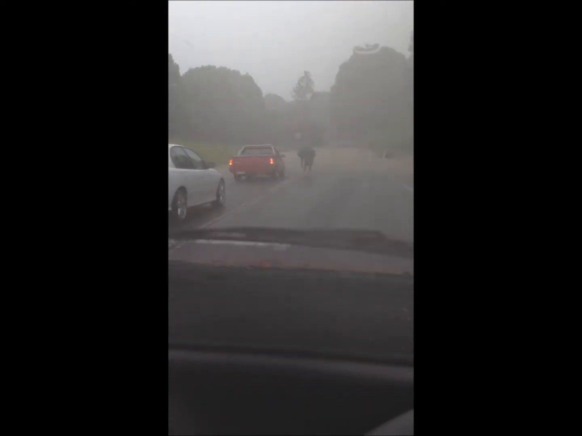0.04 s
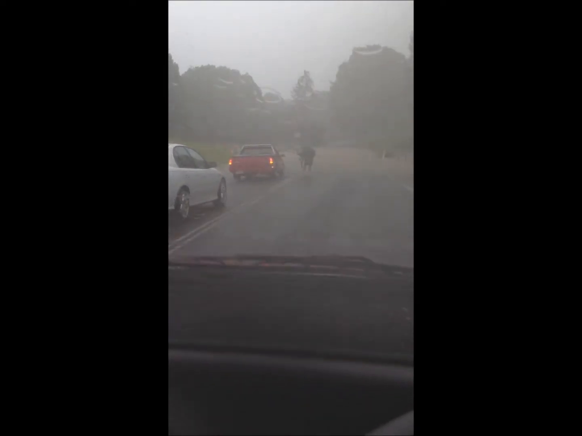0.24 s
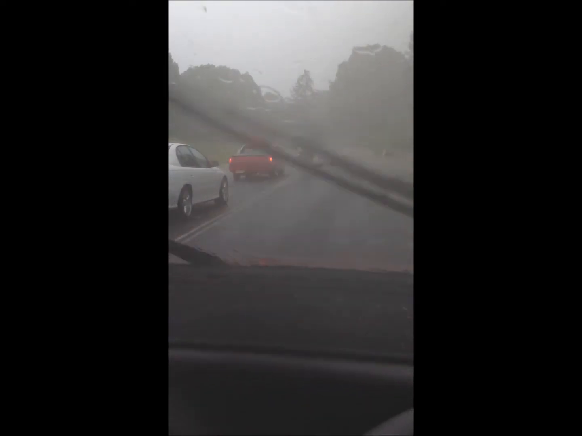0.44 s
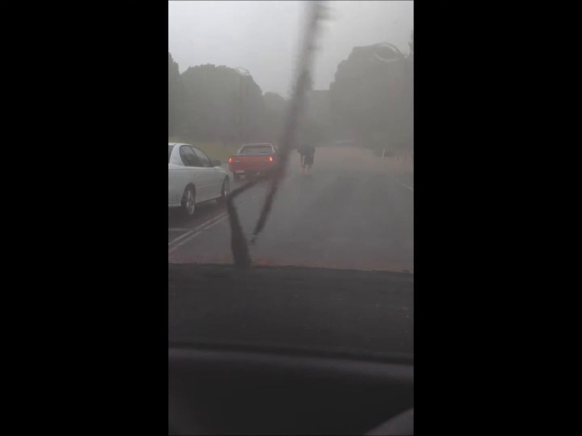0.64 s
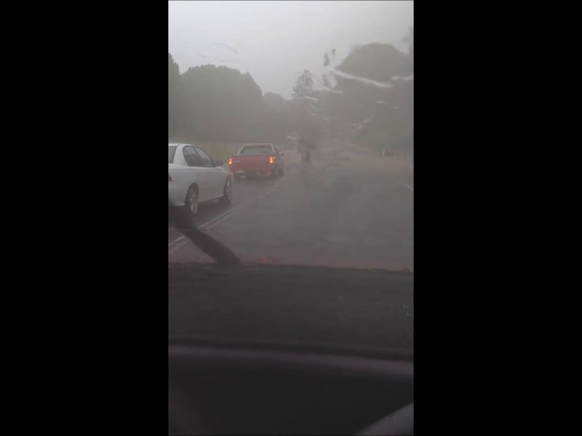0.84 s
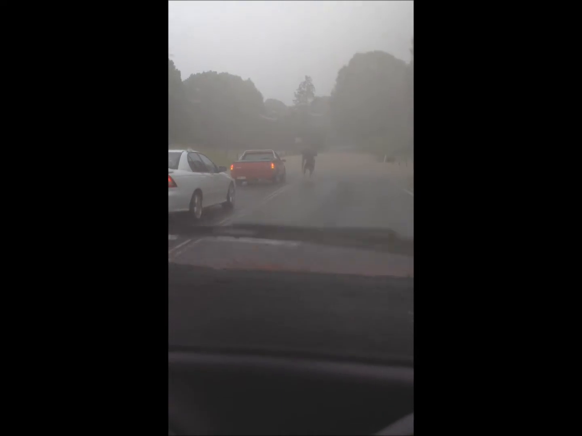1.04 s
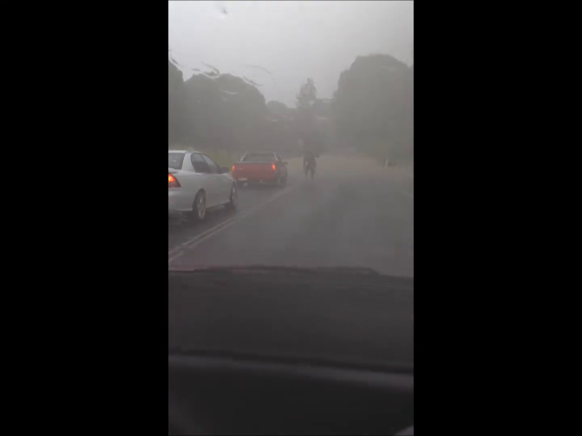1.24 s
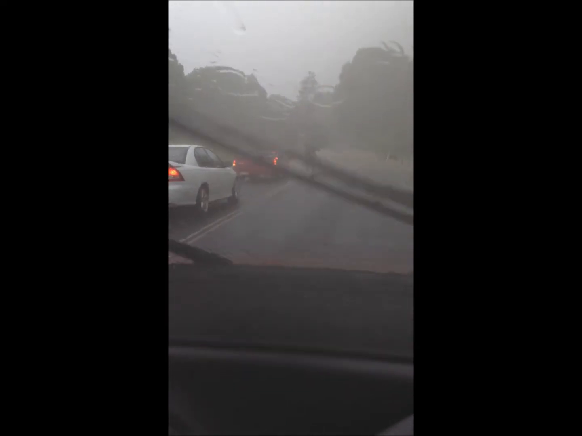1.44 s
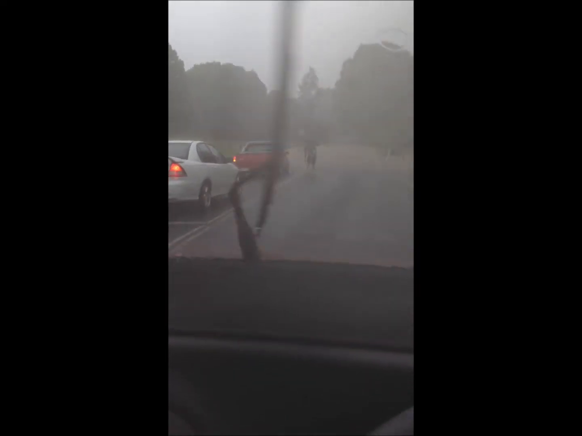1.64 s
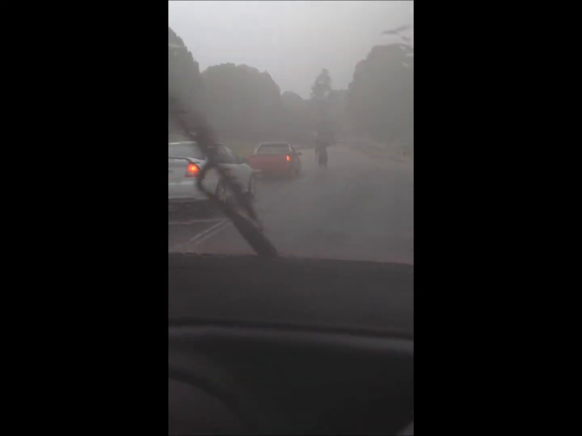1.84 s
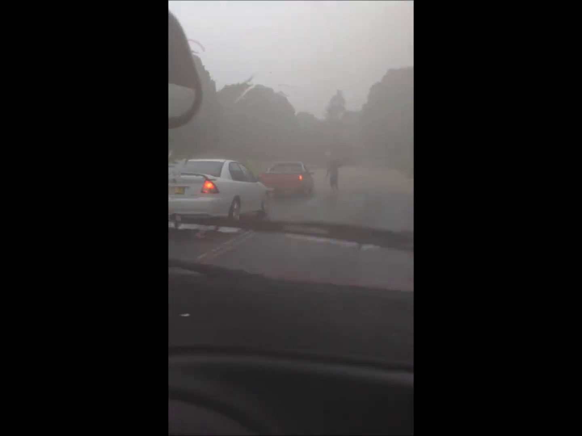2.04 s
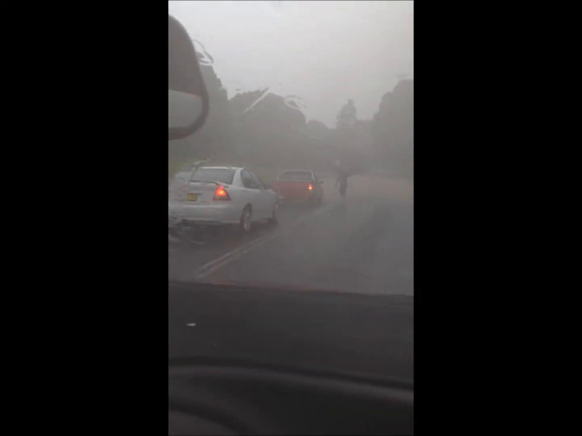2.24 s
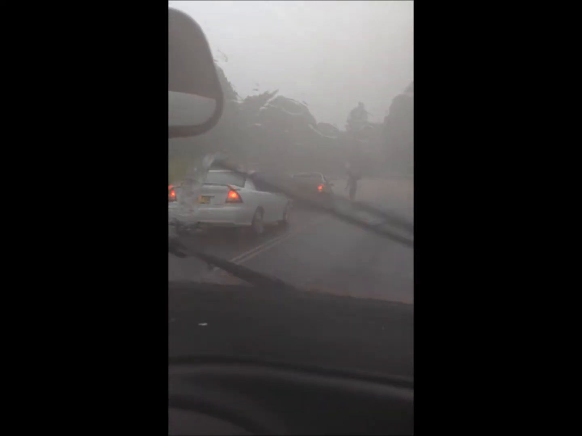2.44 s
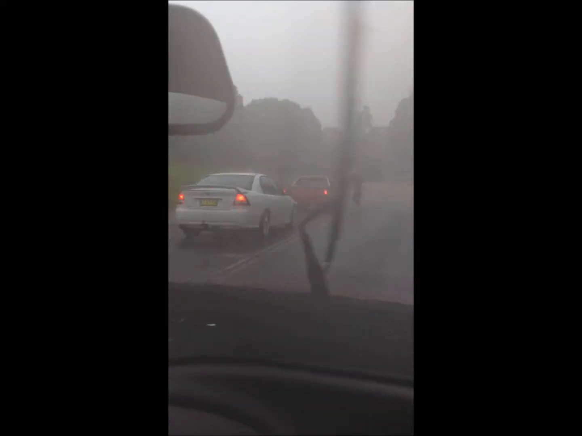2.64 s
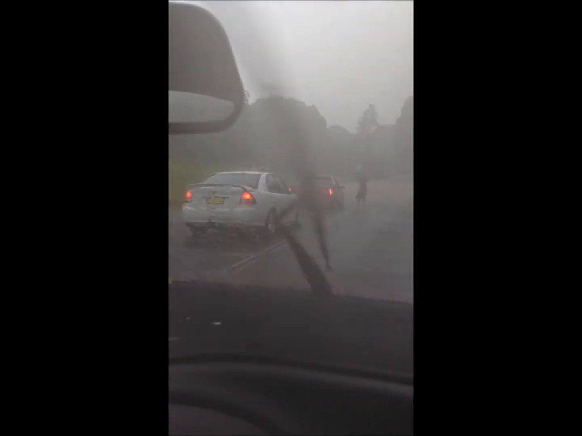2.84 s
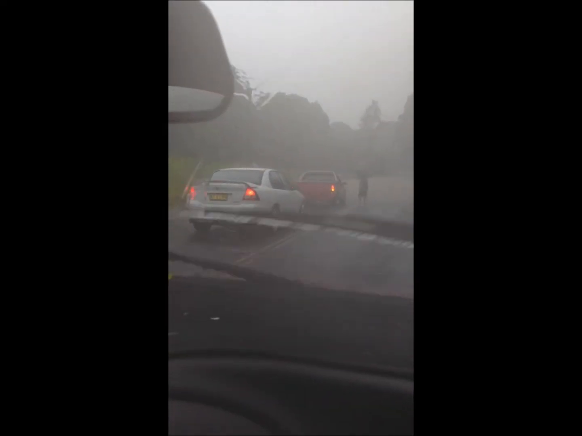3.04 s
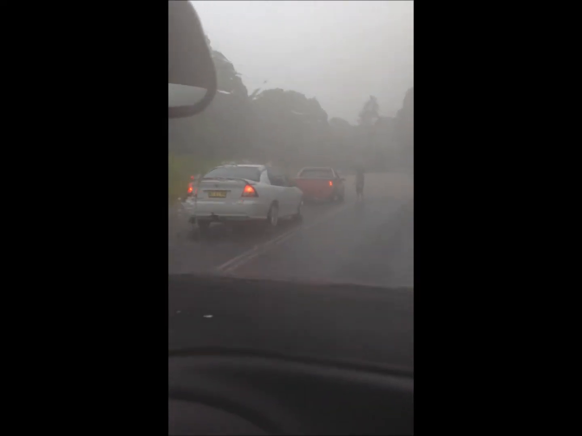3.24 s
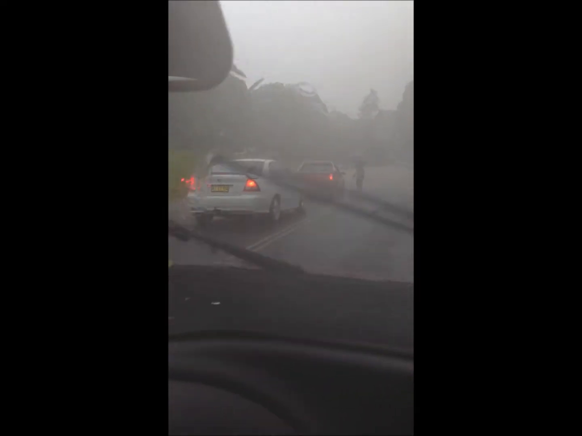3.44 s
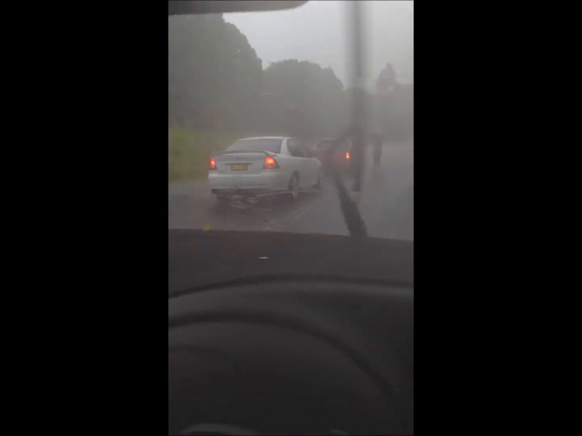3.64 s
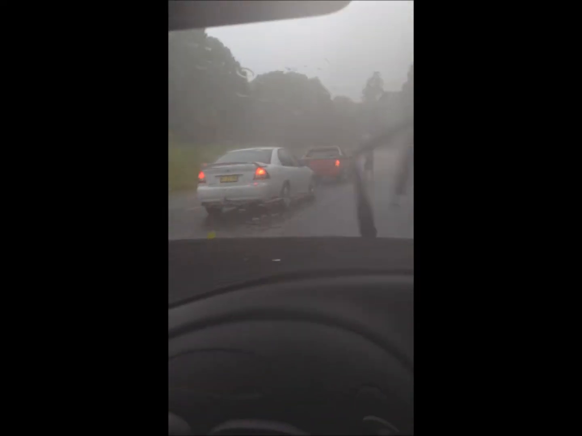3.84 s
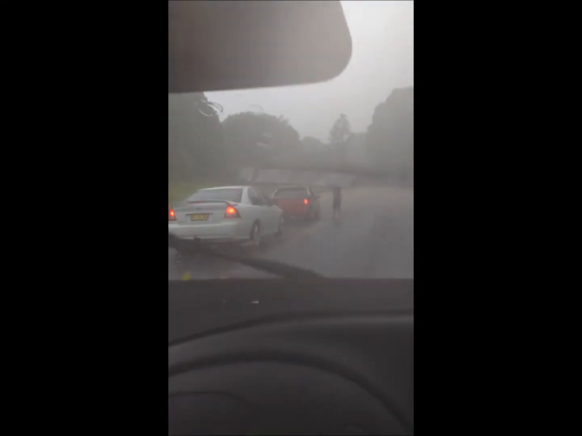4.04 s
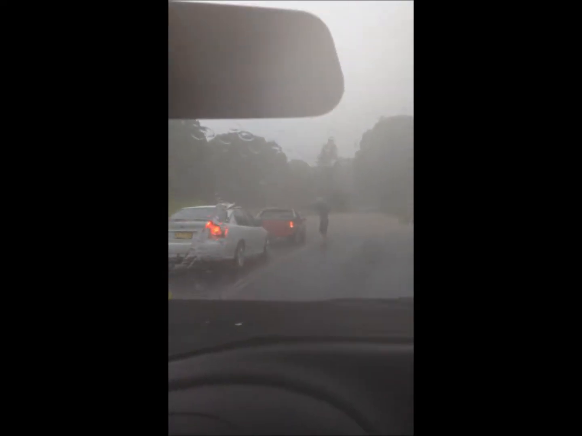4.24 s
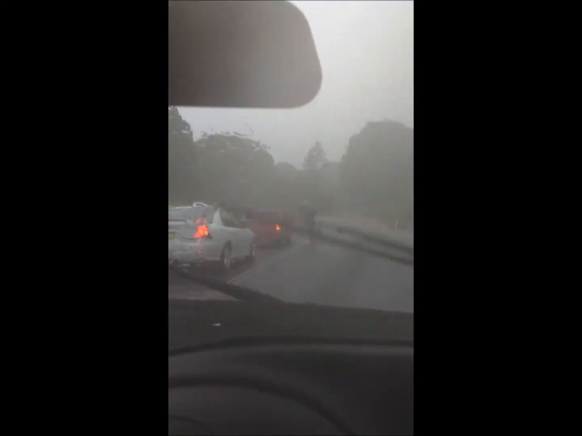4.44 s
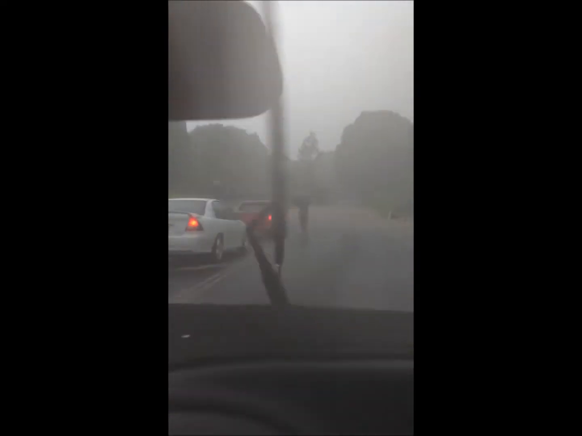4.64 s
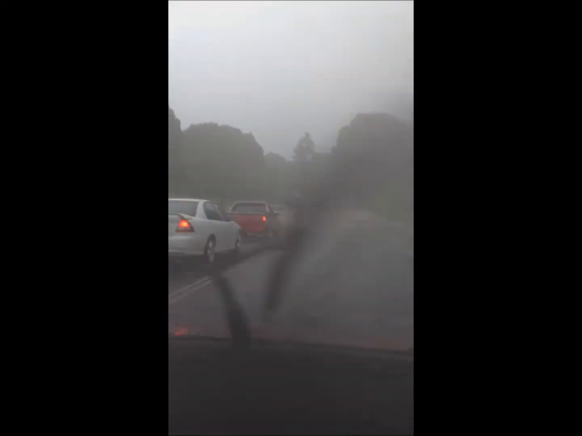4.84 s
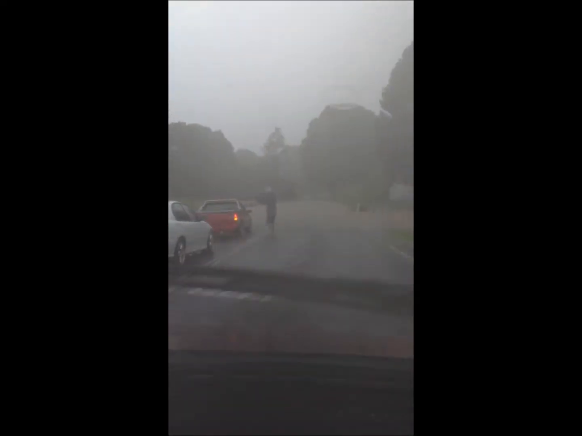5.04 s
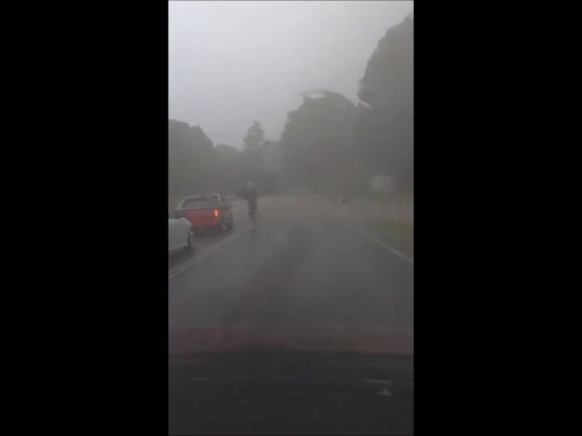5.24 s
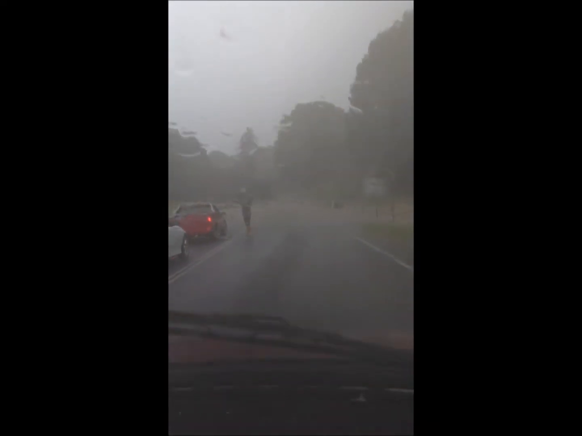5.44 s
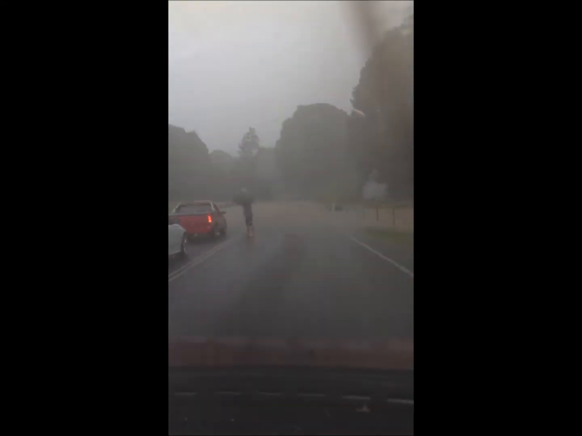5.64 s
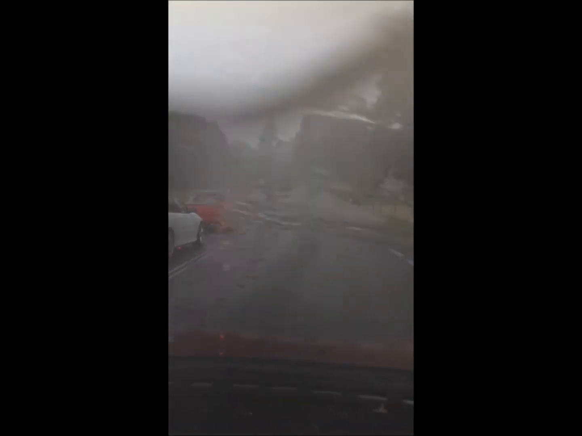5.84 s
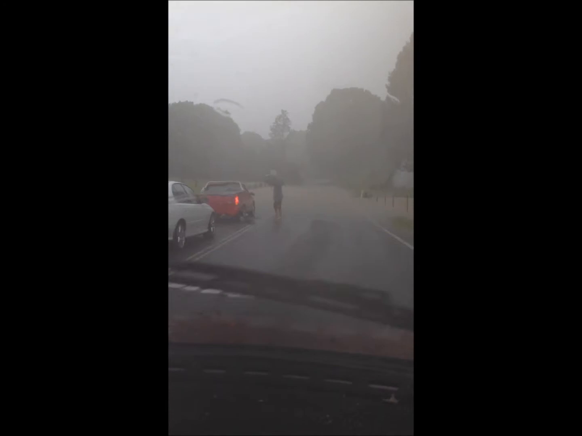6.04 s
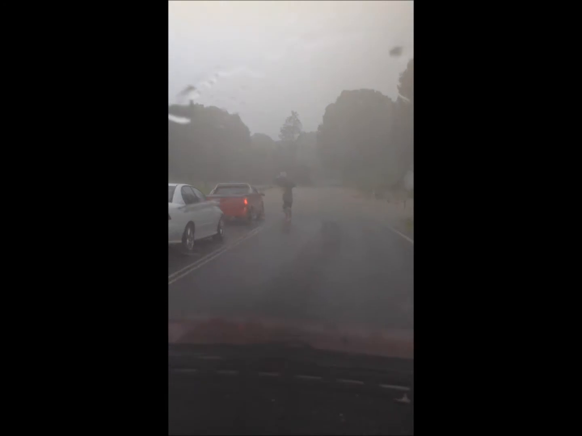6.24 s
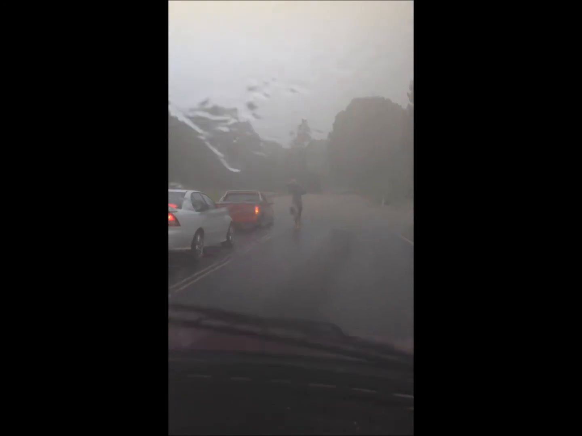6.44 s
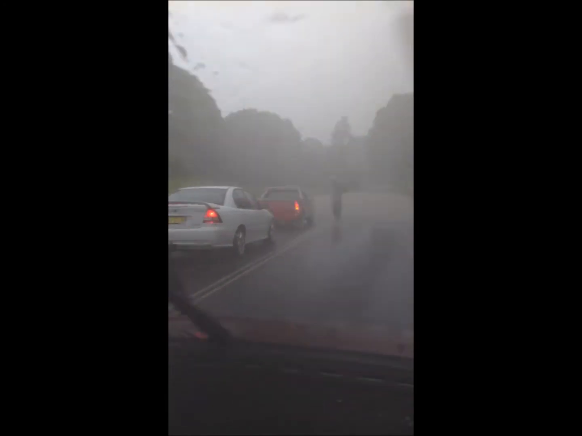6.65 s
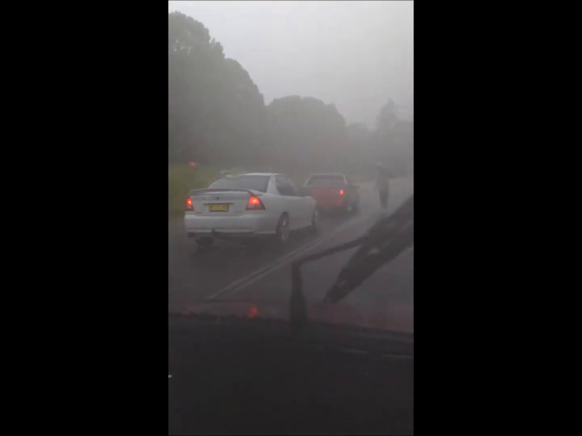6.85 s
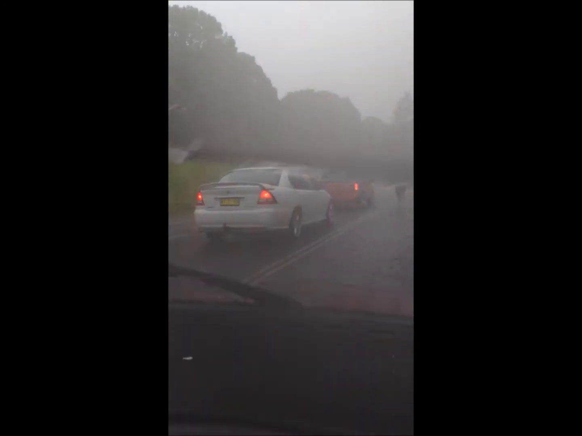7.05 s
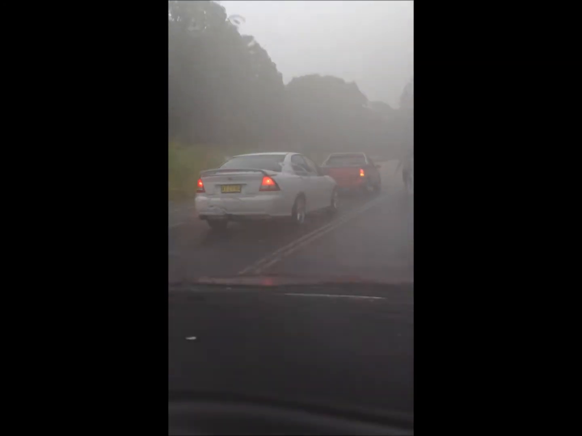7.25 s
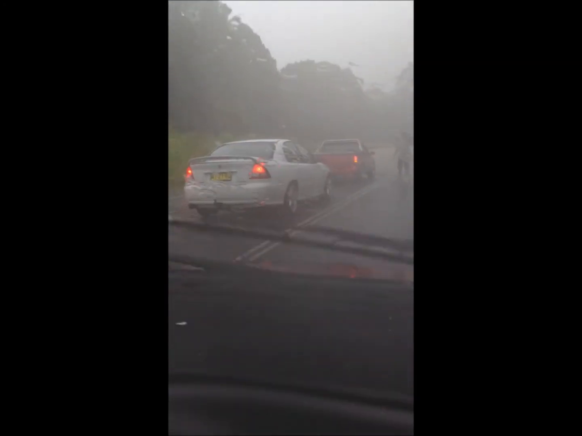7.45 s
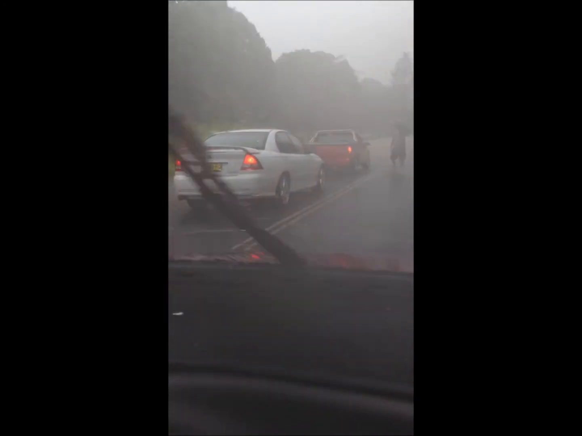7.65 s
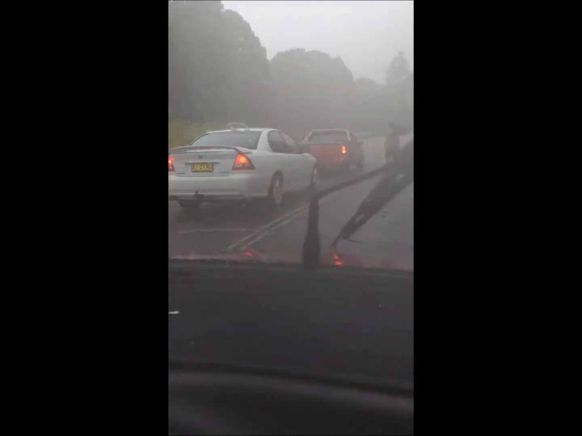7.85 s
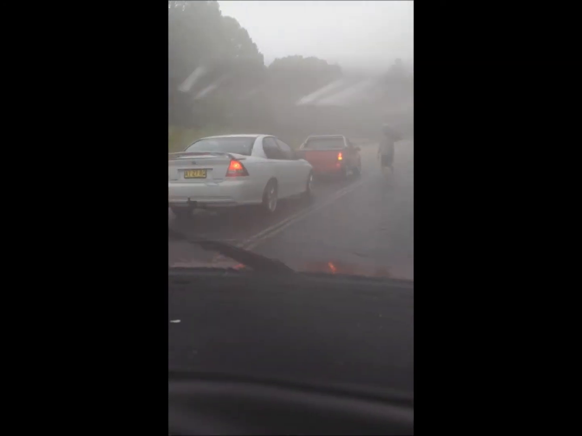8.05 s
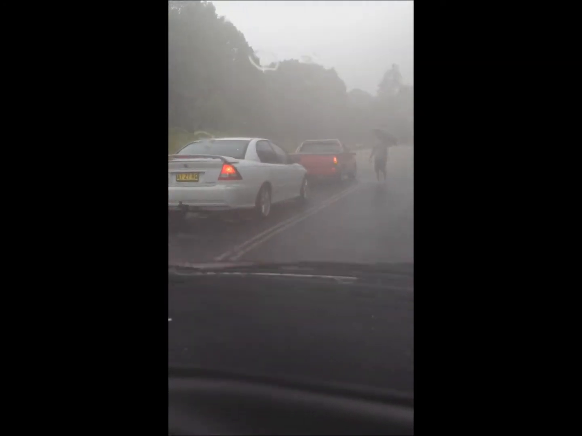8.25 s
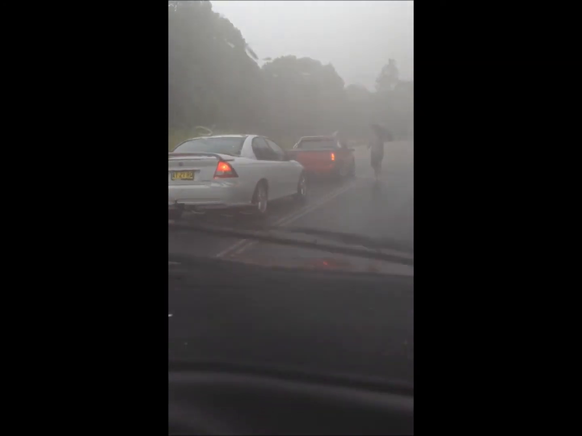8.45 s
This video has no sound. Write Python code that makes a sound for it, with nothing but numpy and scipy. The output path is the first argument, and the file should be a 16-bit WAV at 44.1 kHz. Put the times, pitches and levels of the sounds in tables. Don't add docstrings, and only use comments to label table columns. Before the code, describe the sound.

Heard from inside a standing car, heavy rain is already drumming from 0 s: a dense, dull low roar on roof and bonnet, with fainter patter on the windscreen. The engine's soft, low idle boom lies beneath. Wipers cross the glass about once a second; blades flop over with a muffled thump roughly every half second from 0.3 s, uneven in strength. Near 0.35, 1.4, 2.4, 3.4 s and onward, a small dry click follows a thump, then a weaker one, with faint ticks between. Fat drops ring hollow on roof panels, clustering around 2.1-2.5 s, when rain swells. It eases about 3.4-4.5 s, strengthens near 5 s, and stays heavy with strong drops at 5.9, 6.4 and 6.9 s and many from 7.4 to 8.3 s. Rain and wipers continue to the cut at 8.5 s. Phone microphone, small padded cabin, light hiss and a barely perceptible high whine.

```python
import sys
import numpy as np
from scipy import signal
from scipy.fft import rfft, irfft
from scipy.io import wavfile
from scipy.ndimage import uniform_filter1d

SR = 44100
rng = np.random.default_rng(int(sys.argv[2]) if len(sys.argv) > 2 else 0)


def dump_mix(stems):
    frames = np.atleast_2d(stems).T
    limited = np.clip(frames, -1, 1)
    pcm = np.round(limited * 32767).astype(np.int16)
    wavfile.write(sys.argv[1], SR, pcm)


def ratio(d):
    e = np.asarray(d, float) / 20
    return 10 ** e


N = 375291
TIME = np.arange(N) / SR

# [t/s, strength/dB, extra blown against the glass/dB]
RAIN = [(0, -32, -2.5), (.6, -32, -1.5), (1.1, -32.5, 2.5), (1.5, -31.5, -1), (1.85, -32.5, 2),
        (2.25, -27.5, 1.5), (2.9, -30, 2.5), (3.4, -34.5, 3), (3.75, -34, 2), (4.4, -35, -0.5),
        (4.85, -31.5, 0), (5.3, -30.5, -2.5), (5.9, -33, -3), (6.5, -32, 1), (6.9, -32, -2.5),
        (7.5, -30.5, 1), (8.15, -33.5, 0.5), (8.51, -30, -3.5)]
# [t/s, peak level/dB, f/Hz]
BIG_DROPS = [(0.151, -14.5, 538), (0.266, -20, 350), (0.316, -15.5, 462), (1.174, -17, 568),
             (1.796, -18.5, 520), (2.089, -14.5, 635), (2.233, -10.5, 561), (2.387, -16, 516),
             (2.416, -15.5, 528), (2.452, -12.5, 530), (2.509, -15, 532), (2.901, -14.5, 557),
             (3.299, -14.5, 553), (4.13, -16.5, 560), (4.846, -18, 614), (4.99, -17, 605),
             (5.353, -13.5, 558), (5.868, -11.5, 508), (6.056, -14, 479), (6.377, -10.5, 526),
             (6.878, -10, 585), (7.066, -16, 470), (7.372, -14.5, 449), (7.5, -14, 350), (7.79, -14, 547),
             (7.892, -15.5, 507), (8.079, -16, 526), (8.16, -18, 544), (8.265, -14.5, 610),
             (8.32, -18, 516)]
# [t/s, thump level/dB, scrape level/dB]
BLADE_TURNS = [(0.276, -25, -62), (0.790, -39, -56), (1.295, -35, -71), (1.803, -24.5, -63),
               (2.309, -36, -60.5), (2.807, -30.5, -56), (3.334, -25.5, -61), (3.843, -24, -65),
               (4.351, -27, -67), (4.868, -25, -60.5), (5.361, -33, -55), (5.869, -22.5, -56),
               (6.384, -27, -63), (6.885, -29, -53), (7.375, -33, -62), (7.905, -22.5, -60),
               (8.399, -28.5, -65)]
# [t/s, loud click/dB, second click/dB, tick on the way back/dB, tick before parking/dB]
SWEEPS = [(0.3507, -45, -51.5, -60, -61), (1.3658, -45.5, -50.5, -60, -60), (2.3828, -46, -53, -58, -58),
          (3.3984, -43.5, -51.5, -59, -59), (4.419, -47.5, -50, -56, -58), (5.4374, -45.5, -51.5, -56, -58),
          (6.454, -45.5, -49.5, -60, -53.5), (7.4689, -45, -50.5, -60, -54), (8.486, -44.5, -50, -54, -65)]
# [t after the loud click/s, rattle level/dB, knock in the arm/dB]
KNOCKS = [
    (0, -7, 2.5),
    (.1195, -4.5, 8),
    (-.4, -5, 1),
    (-.2105, -4, 6),
]
# [t after the loud click/s, peak level/dB, rattle/dB, knock in the arm/dB]
UPWARD_TICK = (-0.8, -64, -2, 9)
# [f/Hz, level per Hz/dB]
ROOF = [(40, -53), (110, -12.5), (160, -5.5), (190, -2.5), (212, -2), (230, -4), (262, 0.5), (306, -4.5),
        (350, 1), (390, -9.5), (450, -13), (600, -25), (1200, -54.5), (20000, -110)]
BONNET = [(40, -67.5), (250, -21), (380, -7), (430, -2.5), (480, -2.5), (546, -0.5), (600, -2), (674, -5),
          (780, -11), (900, -22.5), (1400, -41), (2500, -62.5), (20000, -100)]
GLASS = [(40, -43), (500, -13.5), (900, 1), (1100, -3.5), (1430, -14.5), (2100, -27), (2600, -34),
         (4000, -48.5), (8000, -59), (20000, -78.5)]
SHELL = [(20, -41), (50, -37), (85, -11), (105, -13), (125, -0.5), (160, 0.5), (200, -17.5), (400, -35.5),
         (20000, -93)]
LINKAGE = [(40, -59.5), (1300, -11), (1600, -5), (1900, 2), (2150, -1), (2400, 2.5), (2700, -2.5),
           (3000, -5.5), (3250, -6), (3500, -6), (4200, -17), (4700, -16.5), (5500, -33.5), (20000, -61.5)]
ARM = [(40, -50), (700, -12.5), (1100, 0), (1600, 0.5), (2000, -5.5), (2500, -14), (20000, -70.5)]
HISS = [(20, 14), (60, 8), (2000, 1), (3600, -2.5), (7000, -6), (8500, -9.5), (9700, -14), (11000, -9.5),
        (13400, -4), (15400, -5.5), (20000, -4)]


def level(x, db):
    return x * ratio(db) / np.sqrt(np.mean(x ** 2))


def colour(x, points, size=8192):
    hz, db = np.transpose(points)
    bins_hz = np.arange(size // 2 + 1) * SR / size
    log_gain = np.interp(np.log(bins_hz + 1), np.log(hz), db) * np.log(10) / 20
    cepstrum = irfft(log_gain)
    cepstrum[1:size // 2] *= 2
    cepstrum[size // 2 + 1:] = 0
    response = irfft(np.exp(rfft(cepstrum)))
    return signal.fftconvolve(np.append(x[-size:], x), response)[size:size + len(x)]


def walk(rate):
    hold = int(SR / rate)
    values = rng.standard_normal(N // 20 + 1)[:N // hold + 1]
    steps = np.repeat(values, hold)
    return 0.96 * uniform_filter1d(uniform_filter1d(steps, hold), hold)[:N]


def drops(per_second, spread_db):
    hit = rng.random(N) < per_second / SR
    size = rng.exponential(size=N)
    sign = rng.choice([-1., 1.], N)
    return hit * sign * ratio(spread_db * np.minimum(size, 2.8))


def cabin(hits, t60, wet_db):
    fade = np.exp(-2 * np.log(1000) * TIME[:SR // 4] / t60)
    energy = signal.fftconvolve(hits ** 2, fade / fade.sum())[:N]
    return hits + ratio(wet_db) * np.sqrt(np.abs(energy)) * rng.standard_normal(N)


def boom():
    shaking = colour(rng.standard_normal(N), SHELL)
    return level(shaking, 0.73) * ratio(-39.5 + 0.62 * walk(9.7))


def tick_list():
    scatter_s, scatter_db = 0.0027, 1.5
    upward_s, upward_db, *upward_colour = UPWARD_TICK
    rows = []
    for s, *click_db in SWEEPS:
        for (after, rattle_db, arm_db), db in zip(KNOCKS, click_db):
            rows.append((s + after, db, rattle_db, arm_db))
        late, loud = rng.standard_normal(2)
        rows.append((s + upward_s + scatter_s * late, upward_db + scatter_db * loud, *upward_colour))
    return [row for row in rows if .01 < row[0] < N / SR]


def wiper_ticks():
    linkage, arm, t = np.zeros(N + SR), np.zeros(N + SR), TIME[:2048]
    rattle_fade = np.exp(-np.log(1000) * t / 0.051) * (t > .0035)
    bins_hz = np.arange(len(t) // 2 + 1) * SR / len(t)
    chirp = irfft(np.exp(-4j * np.pi * .11 * np.sqrt(bins_hz)))
    for s, db, rattle_db, arm_db in tick_list():
        rattle = rng.standard_normal(len(t)) * rattle_fade
        knock = ratio(db) * (chirp + ratio(rattle_db - 13.0) * rattle)
        start = int((s - .0014) * SR)
        linkage[start:start + len(t)] += knock
        arm[start:start + len(t)] += ratio(arm_db) * knock
    return (ratio(21.5) * colour(linkage, LINKAGE) + ratio(24.) * colour(arm, ARM))[:N]


def wiper_turns():
    s, thump_db, scrape_db = np.transpose(BLADE_TURNS)
    half_s = .011
    shapes = np.exp(-.5 * ((TIME - s[:, None]) / half_s) ** 2)
    judder = drops(3000., 1.6)
    body = level(colour(judder, ROOF), -2.0)
    body += level(colour(judder, BONNET), -3.5)
    body += level(colour(judder, SHELL), -17.0)
    scrape = level(colour(drops(1000.0, 1.5), GLASS), 9.9)
    return ratio(thump_db) @ shapes * body + ratio(scrape_db) @ shapes * scrape


def big_drops():
    out, t = np.zeros(N + SR), TIME[:SR // 10]
    onset = 1 - np.exp(-(t / 0.0017) ** 2)
    decay = np.exp(-np.log(1000) * t / 0.054)
    for s, db, hz in BIG_DROPS:
        ring = np.sin(2 * np.pi * hz * t) + 0.17 * np.sin(2 * np.pi * 1.3 * hz * t)
        start = int(s * SR)
        out[start:start + len(t)] += ratio(db - 2.0) * ring * onset * decay
    return out[:N]


def rain():
    s, strength_db, blown_db = np.transpose(RAIN)
    strength = np.interp(TIME, s, strength_db) + 33
    roof_db = -35.5 + 0.28 * strength
    bonnet_db = -33 + 1.046 * strength
    glass_db = -52.5 + strength + np.interp(TIME, s, blown_db)
    patch = walk(5.9)
    roof = colour(cabin(drops(1200., 2.3), 0.097, 1.5), ROOF)
    bonnet = colour(cabin(drops(1500., 1.8), 0.15, 2.1), BONNET)
    glass = colour(cabin(drops(2000., 2.7), 0.054, 3.1), GLASS)
    roof = level(roof, 0.13) * ratio(roof_db + 1.2 * patch + 0.88 * walk(9.2))
    bonnet = level(bonnet, 0.15) * ratio(bonnet_db + .8 * patch + 0.46 * walk(15.0))
    glass = level(glass, 0.26) * ratio(glass_db + 0.4 * patch + 1.5 * walk(9.))
    return roof + bonnet + glass


def scene():
    return (boom() + wiper_ticks() + wiper_turns() + big_drops() + rain())[None]


def band_limit(x):
    return signal.sosfilt(signal.butter(12, 15350, fs=SR, output="sos"), x)


def record(dry):
    high_pass = signal.butter(2, 55., "high", fs=SR, output="sos")
    heard = signal.sosfilt(high_pass, dry)
    hiss = level(colour(rng.standard_normal(N), HISS), -67.0)
    whine_hz = 13787 + 5. * walk(3.)
    whine = np.sqrt(2) * ratio(-99) * np.sin(2 * np.pi * np.cumsum(whine_hz) / SR)
    to_edge = np.minimum(TIME, TIME[::-1])
    edges = np.sin(np.pi / 2 * np.minimum(to_edge / .002, 1))
    return band_limit((heard + hiss + whine) * edges)


dry = scene()
out = record(dry)
dump_mix(out)
```